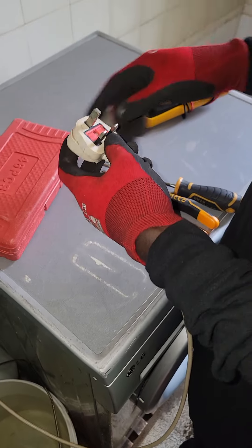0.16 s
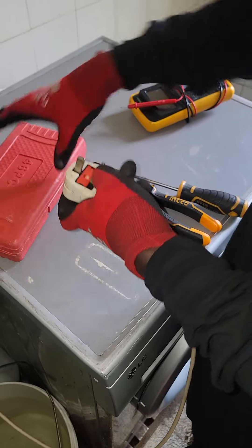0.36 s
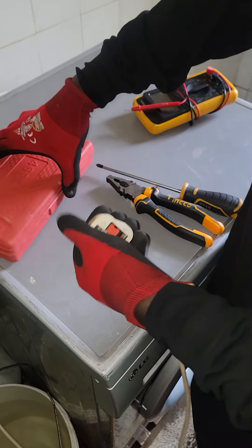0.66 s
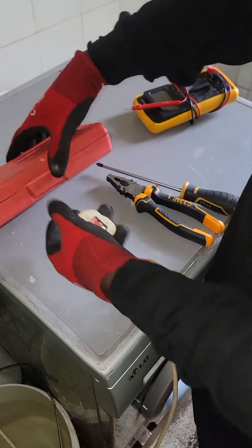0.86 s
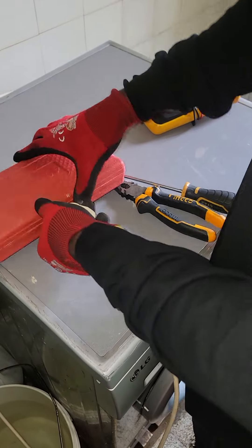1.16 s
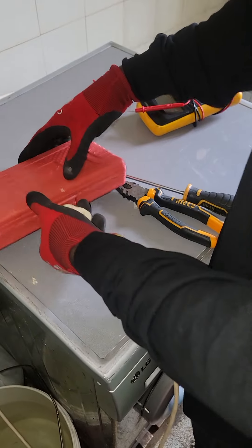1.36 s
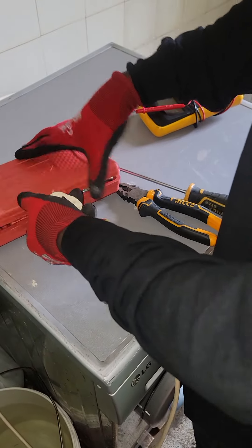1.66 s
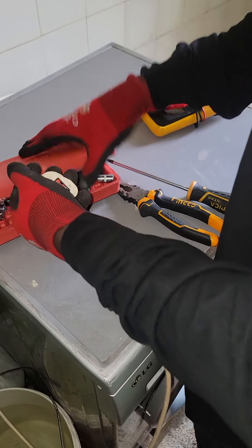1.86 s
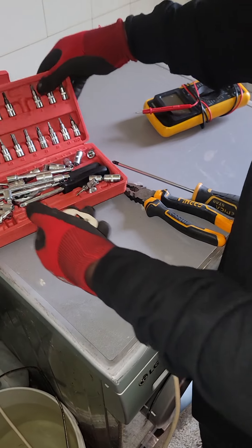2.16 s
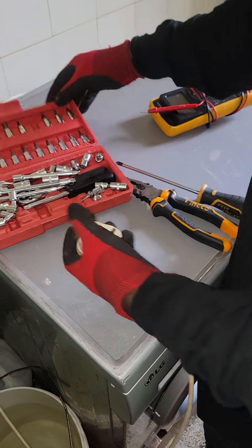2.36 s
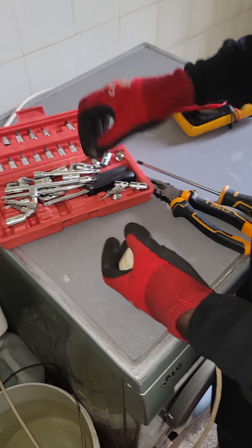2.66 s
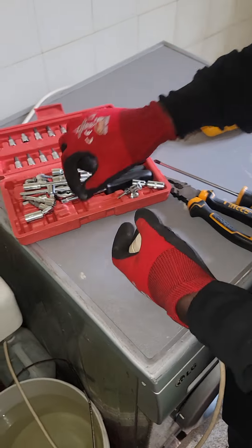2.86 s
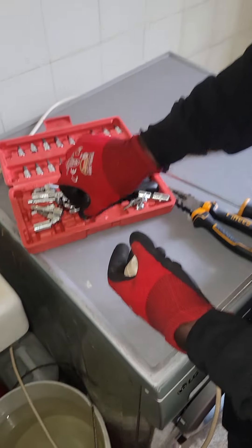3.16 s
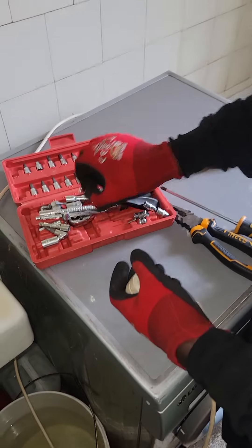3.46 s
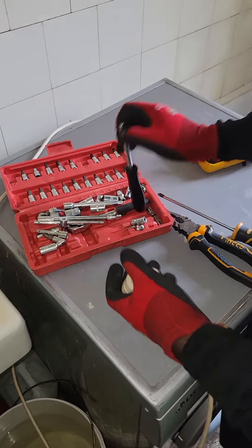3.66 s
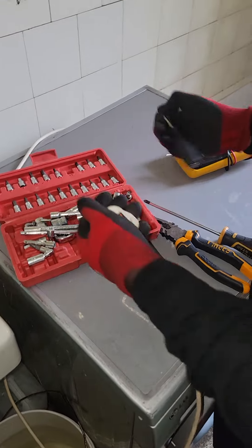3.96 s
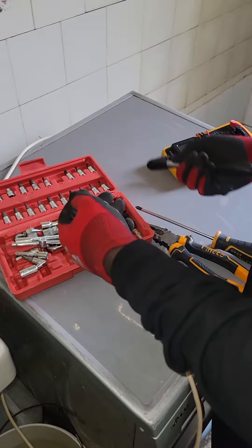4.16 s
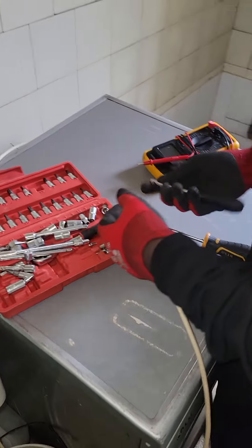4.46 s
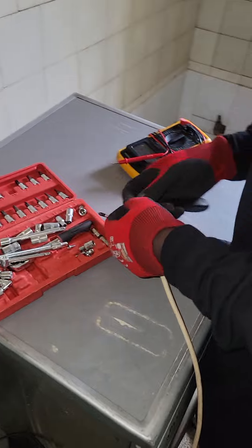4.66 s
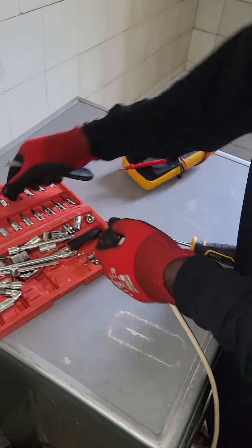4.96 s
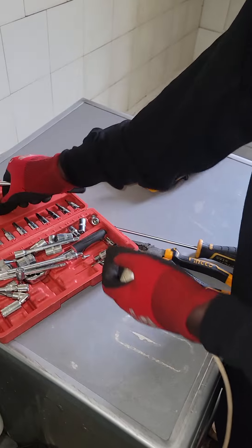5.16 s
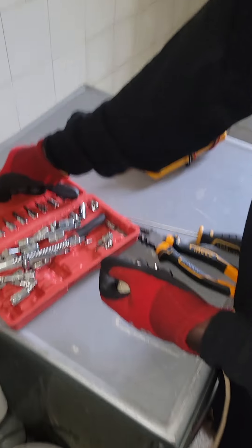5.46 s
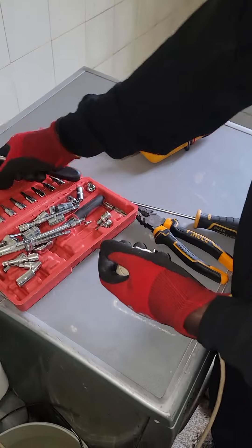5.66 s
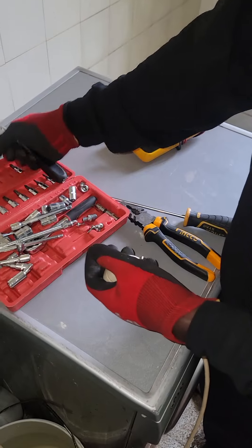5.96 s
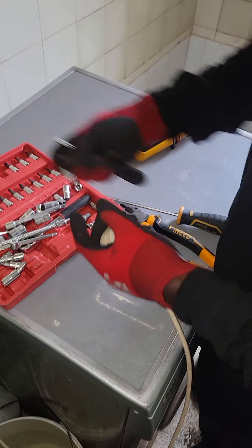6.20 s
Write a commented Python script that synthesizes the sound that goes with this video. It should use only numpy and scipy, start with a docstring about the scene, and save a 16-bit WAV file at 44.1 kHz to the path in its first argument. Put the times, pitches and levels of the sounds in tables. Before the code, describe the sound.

Close stereo microphone, lively short echoes. Soft low bumps lead into scraping plastic and a hard double clack as a case opens on a booming metal surface. A thump follows, then a bright high socket clink, scattered steel rattles and two firm knocks. Near silence with light cloth brushing, a dry tick, then a quick busy clatter. Low hum and quiet air stay beneath.

```python
"""Knocks, clacks and steely rattles of a plastic tool case, dragged, opened and rummaged through
on the sheet-metal top of a machine in a tiled room, with a low wavering hum underneath.
Each knock drives damped modes of the top, the hollow case, its thin walls and the loose steel inside;
handling adds showers of small contacts. Cloth brushes, dry ticks and air are shaped noise,
and dense stereo echoes form the room."""
import sys
import numpy as np
from scipy import signal
from scipy.fft import irfft
from scipy.io import wavfile

SR = 44100
rng = np.random.default_rng(int(sys.argv[2]) if len(sys.argv) > 2 else 0)


def persist_wave(psi):
    """Save psi, clipped to +-1, as 16-bit WAV."""
    counts = np.round(np.clip(psi, -1, 1) * 32767).astype(np.int16)
    wavfile.write(sys.argv[1], SR, np.atleast_2d(counts).T)


N = 279153   # length [samples]

# knocks: (time [s], wall clack [dB], top boom [dB], hollow body [dB], lid over case [dB],
#          loose steel [dB], room send against the knock [dB])
KNOCKS = [(0.379, -73, -40.5, -62.5, 18, -86, 19.5), (0.554, -53, -39, -61, 7, -62, 8.5),
          (0.648, -47.5, -22, -42.5, 7, -77, 8), (0.763, -34.5, -19.5, -29, 8.5, -48.5, 11.5),
          (0.776, -35, -40.5, -30.5, 6.5, -46, 7), (0.804, -27, -39, -23.5, -2, -32, 0),
          (0.954, -28.5, -42, -32, 4, -35, 7.5), (0.963, -26.5, -46.5, -28.5, 3.5, -38, 5),
          (1.117, -38, -32, -34.5, 3, -54, 9), (1.17, -33, -38, -32, 9.5, -45.5, 5.5),
          (1.179, -29.5, -45.5, -27.5, 11, -42.5, 2), (1.22, -27, -14, -22.5, 14, -44.5, 9.5),
          (1.236, -33, -44, -23.5, 10, -42, 0), (1.276, -14, -47, -8, -6.5, -35, 3.5),
          (1.336, -29, -16, -19.5, -1, -48, 0.5), (1.49, -23, -23, -18, 4, -37, 0.5),
          (1.587, -24.5, -44, -12, 7.5, -37.5, 5), (1.633, -17, -9, -13, -9, -28.5, 10),
          (1.646, -17, -32.5, -11, -0.5, -30, 2), (1.661, -6, -6.5, -5, -1.5, -22.5, 1),
          (1.69, -33, -11, -13, -5, -24, 0), (1.711, -19.5, -34.5, -8, -10, -43, -8),
          (1.736, -49, -13, -11, -8, -29, -2), (1.783, -51, -18, -26, 3, -32.5, -4),
          (1.817, -26, -40, -21, -9, -38, 1), (1.884, -50, -25, -30.5, 17, -68, 4.5),
          (2.067, -44, -31, -41.5, 2.5, -55, 1.5), (2.225, -39, -37.5, -38.5, 2.5, -58, 5.5),
          (2.246, -48, -62, -31, 25, -59, 5), (2.318, -35.5, -38, -33, 18, -47, 4),
          (2.418, -34, -34, -30.5, 0.5, -45.5, 8), (2.442, -20, -11.5, -15.5, -1, -29.5, 6.5),
          (2.548, -31, -39, -20, 13, -39.5, 2), (3.028, -29, -41.5, -25.5, -1.5, -20.5, 4),
          (3.042, -27.5, -35, -20.5, 12, -28.5, 7.5), (3.083, -18, -47, -27.5, -5, -22, -1.5),
          (3.293, -27, -33.5, -28.5, 6, -33.5, -2.5), (3.428, -37, -57.5, -42.5, 11.5, -56, 3.5),
          (3.473, -28.5, -28.5, -33.5, -2.5, -39.5, 4), (3.535, -33, -58.5, -46, -12, -31, 3.5),
          (3.57, -24.5, -55, -27, -8, -29.5, -0.5), (3.598, -30.5, -43, -30.5, 11, -36, 3),
          (3.671, -34, -47, -36, -1.5, -31, -2.5), (3.74, -20.5, -31.5, -28.5, -19, -30, 0.5),
          (3.786, -14, -30, -14, 0, -20, -0.5), (3.955, -14.5, -48.5, -20, 19.5, -23.5, -2.5),
          (4.12, -27, -50, -41, 14, -47, 0.5), (5.246, -34.5, -40, -36, -15.5, -48, 1.5),
          (5.262, -27.5, -62, -38.5, 26, -37, 0), (5.62, -34.5, -39, -36.5, -26, -50, -1.5),
          (5.784, -39.5, -35, -44, -18, -57, 6.5), (5.894, -25, -62, -26, -2.5, -32, 6),
          (5.949, -12.5, -51, -12.5, 1.5, -22.5, -0.5), (5.985, -17.5, -45, -12, -2.5, -20.5, -2.5),
          (6.025, -27.5, -56, -41, 14, -33.5, 7.5), (6.068, -32, -37, -27.5, 0, -34, 6.5),
          (6.094, -17.5, -35, -18, 6.5, -25.5, -0.5), (6.119, -36, -56, -25.5, 8, -31, -1),
          (6.137, -23.5, -35, -22, -5, -27, -5.5), (6.164, -26, -46, -31, -4, -50, -18)]
KNOCK_AT = [round(row[0] * SR) for row in KNOCKS]   # [samples]


def from_db(db):
    """Decibels to amplitude gain."""
    return 10 ** (np.asarray(db) / 20)


def rms_one(x):
    """Scale to unit rms."""
    return x / np.sqrt(np.mean(x ** 2) + 1e-20)


def at_hz(points, hz):
    """Read a spectrum table on a log-frequency axis."""
    table = np.array(points)
    return np.interp(np.log(hz), np.log(table[:, 0]), table[:, 1])


def ring(force, hz, t60):
    """One damped mode: a unit click sets a sine of starting height 1 ringing, 60 dB down after t60 [s]."""
    radius = from_db(-60 / (max(t60, .001) * SR))
    turn = 2 * np.pi * hz / SR
    return signal.lfilter([0, np.sin(turn)], [1, -2 * radius * np.cos(turn), radius ** 2], force + 1e-18)


def radiate(x, modes):
    """A small body radiates little below its lowest mode, so a high-pass sits just under it."""
    return signal.sosfilt(signal.butter(4, .8 * modes[0][0], "high", fs=SR, output="sos"), x)


def stereo_bands(size, shape):
    """Half-octave noise bands, each with its own left-right likeness; shape(hz) gives a band's gain."""
    # (frequency [Hz], left-right likeness, -1 to 1)
    likeness = [(60, -0.13), (130, -0.086), (290, 0.91), (640, -0.68), (1410, -0.17), (3100, -0.0033),
                (6820, -0.027), (15000, 0.022)]
    edges = 30 * 2 ** np.arange(0, 9.6, .5)
    white = rng.standard_normal((2, 2, size))
    out = 0
    for k, (low, high) in enumerate(zip(edges, edges[1:])):
        band = signal.butter(2, [low, high], "band", fs=SR, output="sos")
        mid, side = signal.sosfilt(band, white[k % 2])   # neighbouring bands use different noise
        hz = np.sqrt(low * high)
        alike = np.clip(at_hz(likeness, hz), -1, 1)
        stereo = np.sqrt(1 + alike) * mid + np.sqrt(1 - alike) * side * [[1], [-1]]
        out = out + shape(hz) * stereo
    return out


def air():
    """The steady murmur of air and far machines: noise coloured band by band."""
    # (frequency [Hz], colour [dB])
    colour = [(90, -49), (130, -12.5), (260, 2.5), (430, -7), (640, -9), (1100, -10.5), (1600, -45),
              (4000, -34), (7000, -38.5), (8500, -44.5), (10000, -51.5), (12500, -42), (16000, -49)]
    noise = stereo_bands(N, lambda hz: from_db(at_hz(colour, hz)))
    return from_db(-57) * rms_one(noise)


def hum():
    """Low wavering tones: noise held in resonances so narrow that it sounds pitched."""
    # (frequency [Hz], width [Hz], rms level [dB])
    tones = [(48.76, 1.1, -51.5), (73.44, 1.2, -54.5), (81, 9.5, -53.5), (119, 8.0, -65)]
    out = np.zeros(N)
    for hz, width, level_db in tones:
        t60 = np.log(1000) / (np.pi * width)
        tone = ring(rng.standard_normal(N + SR), hz, t60)[SR:]   # drop the first second of build-up
        out += from_db(level_db) * rms_one(tone)
    return out


def brushes():
    """Sleeve and glove brush past close by: smooth bright puffs of cloth noise."""
    # (start [s], length [s], level [dB])
    puffs = [(.09, 0.096, -70.5), (4.736, .06, -69), (4.84, 0.041, -72), (4.95, 0.087, -61.5),
             (5.7, 0.066, -69)]
    t = np.arange(N) / SR
    level = sum(from_db(db) * np.sin(np.pi * np.clip((t - s) / length, 0, 1)) for s, length, db in puffs)
    band = signal.butter(1, [2500, 7000], "band", fs=SR, output="sos")
    return level * rms_one(signal.sosfilt(band, rng.standard_normal((2, N))))


def ticks():
    """Dry ticks of the plug and a fingertip close by: short broad noise snaps with no room behind them."""
    # (time [s], peak [dB], centre [Hz], decay time constant [ms])
    snaps = [(5.49, -34.5, 199, 4.2), (5.49, -61, 1010, 1.4), (5.501, -29.5, 1780, 1.4),
             (5.501, -58, 7000, 0.92), (5.512, -50, 8900, 1.7), (2.804, -53, 4940, 0.65),
             (2.919, -73, 1470, 0.83)]
    out = np.zeros(N)
    span = np.arange(round(.03 * SR)) / SR
    for s, peak_db, hz, decay_ms in snaps:
        burst = rng.standard_normal(len(span)) * np.exp(-1000 * span / decay_ms)
        band = signal.butter(1, [.45 * hz, 1.9 * hz], "band", fs=SR, output="sos")
        snap = signal.sosfilt(band, burst)
        at = round(s * SR)
        out[at:at + len(span)] += from_db(peak_db) * snap / np.max(np.abs(snap))
    return out


def boom():
    """The heavy top is driven through a second, damped resonance, so its modes swell in late."""
    # machine top and hollow body: (frequency [Hz], level against the other modes [dB], t60 [s])
    top = [(54.3, -5.5, 0.89), (68, -11, 0.52), (95.3, 5, 0.38), (152, -5.5, 0.097), (176.3, -5.5, 0.4),
           (220.8, -5, 0.91)]
    top_db, swell_t60_s = -12, .12
    out = np.zeros(N)
    luck = from_db(rng.normal(0, 1.5, (len(KNOCKS), len(top))))
    for k, (hz, level_db, t60) in enumerate(top):
        force = np.zeros(N)
        force[KNOCK_AT] = from_db([row[2] for row in KNOCKS]) * luck[:, k]
        drive = ring(force, hz, swell_t60_s) * 2 * np.log(1000) / (swell_t60_s * SR)
        out += from_db(level_db + top_db) * ring(drive, hz, t60)
    return out


def unrest(hands_db, blows_db):
    """Level [dB] of the small contacts: what hands stir, plus what each knock shakes up and lets settle."""
    rise_s, settle_s = 0.029, 0.014   # time constants of two smoothing stages in a row
    power = np.zeros(N)
    power[KNOCK_AT] = from_db(2 * blows_db) * rise_s * SR
    for seconds in (rise_s, settle_s):
        r = np.exp(-1 / (seconds * SR))
        power = signal.lfilter([1 - r], [1, -r], power + 1e-18)
    return 10 * np.log10(from_db(2 * hands_db) + power)


def rattle(modes, cycles, level_db):
    """Uneven small contacts, dealt at random to the modes of a body."""
    touches_per_s, spread_db = 450, 5.0
    sizes = from_db(spread_db * np.minimum(rng.exponential(1, N), 4)) * rng.choice([-1, 1], N)
    touches = sizes * (rng.random(N) < touches_per_s / SR)
    dealt = rng.integers(0, len(modes), N)
    rings = np.zeros(N)
    for k, (hz, mode_db) in enumerate(modes):
        rings += ring(from_db(mode_db) * (dealt == k) * touches, hz, cycles / hz)
    return from_db(level_db) * rms_one(radiate(rings, modes))


def clinks():
    """Each ring of a socket is a close pair of modes, struck again as it jangles against its neighbours."""
    # one ring of a socket per row; the rows at 3.03 s belong to one socket:
    # (time [s], level of each paired mode [dB], ring [Hz], jangle time constant [s])
    socket_rings = [(1.61, -57.5, 14000, 0.06), (3.026, -36.5, 11430, 0.035), (3.03, -49, 13800, 0.026),
                    (3.03, -24, 3660, 0.007), (3.03, -34.5, 6030, 0.0035), (3.44, -58.5, 10340, 0.0082),
                    (3.482, -55, 11700, .01), (3.535, -48.5, 9480, 0.022), (3.6, -47, 11600, 0.02)]
    touches_per_s, t60_s = 900, 0.029
    split = 0.0047   # each mode's offset from the ring, as a share of its frequency
    out = np.zeros(N)
    span = np.arange(round(.15 * SR)) / SR
    for s, level_db, hz, jangle_s in socket_rings:
        touches = rng.standard_normal(len(span)) * (rng.random(len(span)) < touches_per_s / SR)
        jangle = touches * np.exp(-span / jangle_s)
        force = np.r_[1, jangle[1:], np.zeros(SR // 2)]   # first strike, jangle, time to ring out
        pair = ring(force, hz * (1 - split), t60_s) + ring(force, hz * (1 + split), t60_s)
        at = round(s * SR)
        out[at:at + len(force)] += from_db(level_db) * pair
    return out


def knocks(modes, cycles, contact_ms, blows_db):
    """A short dying chatter drives every mode with its own strength; rows: direct, sent to the room."""
    touch_rise_s = 0.00042
    span = np.arange(round(.06 * SR)) / SR
    envelope = (1 - np.exp(-span / touch_rise_s)) * np.exp(-1000 * span / contact_ms)
    chatter = rng.standard_normal((len(KNOCKS), len(span))) * envelope
    luck_db = rng.normal(0, 2.0, (len(KNOCKS), len(modes)))
    out = np.zeros((2, N))
    for k, (hz, level_db) in enumerate(modes):
        flips = (-1) ** (np.arange(len(span)) // (k + 2))   # sign flips vary the chatter from mode to mode
        force = np.zeros((2, N + len(span)))
        for row, at, blow_db, noise, chance_db in zip(KNOCKS, KNOCK_AT, blows_db, chatter, luck_db):
            burst = noise * flips
            strength = from_db(blow_db + chance_db[k])
            force[0, at:at + len(span)] += strength * burst / np.sqrt(np.sum(burst ** 2))
            # the echoes blend the chatter into an even colour, so the room gets a plain click
            force[1, at] += strength * from_db(row[-1]) * (-1) ** k
        out += from_db(level_db) * ring(force[:, :N], hz, cycles / hz)
    return radiate(out, modes)


def room(direct, sent):
    """Direct sound, a little later on the right, plus dense echoes that die band by band and keep changing."""
    # (frequency [Hz], t60 [s])
    decay = [(60, 1), (150, 0.83), (400, 0.48), (1000, 0.49), (3000, 0.49), (7000, 0.28), (14000, 0.25)]
    # (frequency [Hz], echo colour [dB]), lowered by 30 dB below
    wet = [(120, 0.5), (250, -10.5), (600, 1), (2000, 1), (6000, 8), (14000, 6)]
    buildup_s, right_lag_s = 0.0017, .0003
    t = np.arange(SR) / SR
    swell = 1 - np.exp(-t / buildup_s)

    def echo_gain(hz):
        return swell * from_db(at_hz(wet, hz) - 30 - 60 * t / at_hz(decay, hz))

    out = np.array([direct, np.roll(direct, round(right_lag_s * SR))])
    # as the hands move, the send fades round four echo patterns, one step each 0.09 s
    spot = np.arange(N) / (.09 * SR)
    for place in range(4):
        fade = np.maximum(np.cos(np.pi / 2 * (spot - place)), 0)
        tail = stereo_bands(SR, echo_gain)
        out += signal.fftconvolve((sent * fade)[None], tail, axes=1)[:, :N]
    return out


def scene():
    """Knocks, clinks and handling in the room, over boom, brushes, ticks, hum and air."""
    # modes of the hollow case, its lid, thin walls, loose steel and the steel's top glint:
    # (frequency [Hz], level against the other modes [dB])
    case, lid, walls = [(270, -12.5), (312, -4.5), (348, 0), (398, -4)], [(450, -7), (510, 0.5), (580, 0.5), (662, 0), (750, -0.5), (830, -0.5)], [(920, -2), (1050, -13.5), (1190, 4), (1350, 4),
                                                   (1550, 3), (1750, -0.5), (1950, 3), (2150, 3.5),
                                                   (2400, 2), (2750, -3)]
    steel, glint = [(3300, -4), (3750, -2.5), (4400, -4.5), (5200, -8), (6120, -8), (7000, -10.5),
                    (8000, -13)], [(9400, -3.5), (11300, -6.5), (12300, 0.5), (13800, -5), (15200, -2)]
    # hands at work: (time [s], case rubbing [dB], steel jingle [dB])
    handling = [(0.0, -62.5, -79), (0.19, -74, -90), (0.67, -55.5, -98), (0.9, -41, -70), (1.15, -56, -80),
                (1.549, -40, -74), (1.899, -40.5, -66), (2.0, -60, -77), (2.8, -60.5, -95),
                (3.299, -58, -67), (3.55, -45, -62), (3.9, -42.5, -62.5), (4.299, -67.5, -88.5),
                (4.999, -64, -79.5), (5.35, -62.5, -82), (5.57, -55, -66), (5.902, -50, -73),
                (6.08, -30, -62), (6.21, -60, -85), (6.33, -70, -82)]
    # by body: ring length to 60 dB down [cycles]; case, steel and glint take more cycles than walls and lid
    ring_cycles = {"walls": 12, "case": 28, "lid": 13, "steel": 24, "glint": 35}
    # by body: decay time constant of a knock's chatter [ms]
    contact_ms = {"walls": 2.9, "case": 3.4, "lid": 2.8, "steel": 3.4, "glint": 6.0}
    # contents shifting after a knock, against the knock: case, walls, steel, glint [dB]
    settle_levels = [-19.5, -27.5, -39, -42]

    s, *columns = np.transpose(handling)
    rub_db, jingle_db = [np.interp(np.arange(N) / SR, s, c) for c in columns]
    _, wall_db, _, body_db, lid_over_db, steel_db, _ = np.transpose(KNOCKS)
    # harder blows are brighter: 14 dB under the steel at a firm -29 dB, 0.39 dB more per dB
    glint_db = steel_db - 14 + 0.39 * (steel_db + 29)
    # the louder of case and lid takes the body level
    case_db = body_db - np.maximum(lid_over_db, 0)
    lid_db = body_db + np.minimum(lid_over_db, 0)

    struck = [("walls", walls, wall_db), ("case", case, case_db), ("lid", lid, lid_db),
              ("steel", steel, steel_db), ("glint", glint, glint_db)]
    tools = np.zeros((2, N))   # rows: direct, sent to the room
    for name, modes, blows_db in struck:
        tools += knocks(modes, ring_cycles[name], contact_ms[name], blows_db)
    tools += clinks() * from_db([[0], [-12]])

    shaken = [("case", case + lid, rub_db, body_db), ("walls", walls, rub_db - 7, wall_db),
              ("steel", steel, jingle_db, steel_db), ("glint", glint, jingle_db - 16, glint_db)]
    for (name, modes, hands_db, blows_db), settle_db in zip(shaken, settle_levels):
        tools += rattle(modes, ring_cycles[name], unrest(hands_db, blows_db + settle_db))
    return room(*tools) + boom() + brushes() + ticks() + hum() + air()


def record(dry):
    """Two microphone ports differ in colour; rumble is cut, peaks are rounded, the top is cut."""
    # (frequency [Hz], left minus right [dB])
    lean = [(60, -5.5), (150, 3), (380, -5), (950, -0.5), (2380, 1), (5980, 2), (15000, -2.5)]
    half_db = at_hz(lean, np.maximum(np.fft.rfftfreq(2048, 1 / SR), 1)) / 2
    ports = [np.roll(irfft(from_db(g)), 1024) * np.hanning(2048) for g in (half_db, -half_db)]
    wet = np.array([signal.fftconvolve(c, p)[1024:1024 + N] for c, p in zip(dry, ports)])
    wet = signal.sosfilt(signal.butter(4, 46, "high", fs=SR, output="sos"), wet)
    wet = wet / (1 + np.abs(wet) ** 4) ** .25   # soft limit at full scale
    return .93 * signal.sosfilt(signal.cheby2(22, 60, 16500, fs=SR, output="sos"), wet)


dry = scene()
out = record(dry)
persist_wave(out)
```